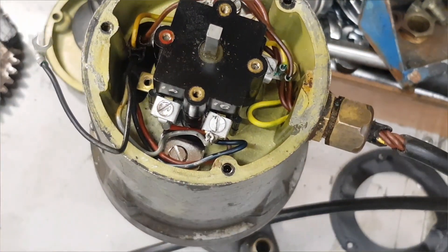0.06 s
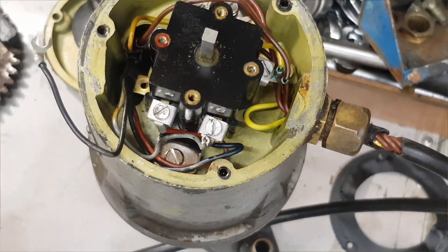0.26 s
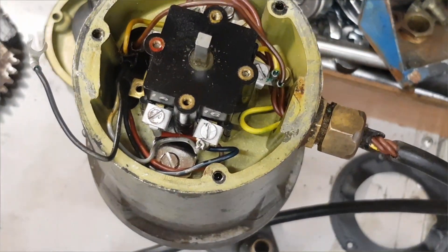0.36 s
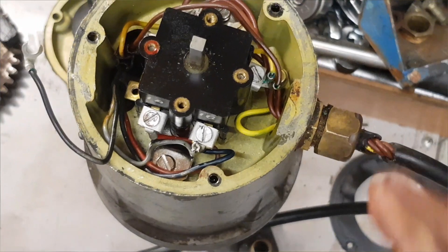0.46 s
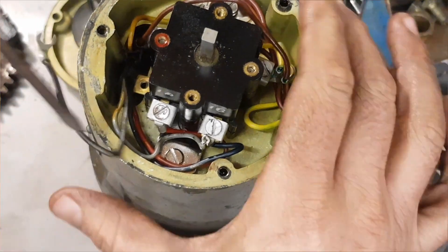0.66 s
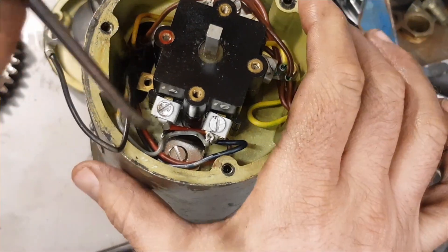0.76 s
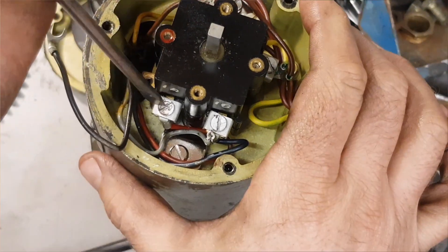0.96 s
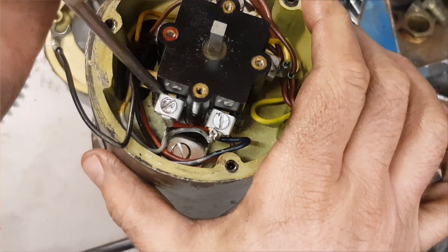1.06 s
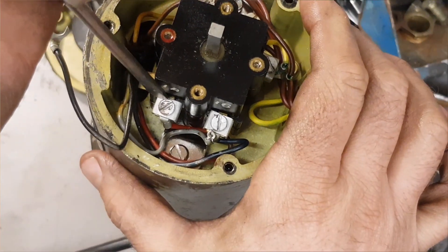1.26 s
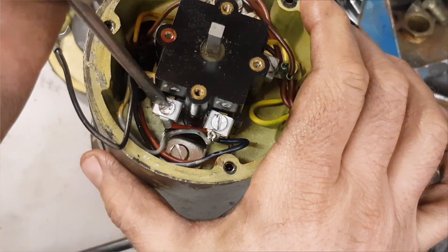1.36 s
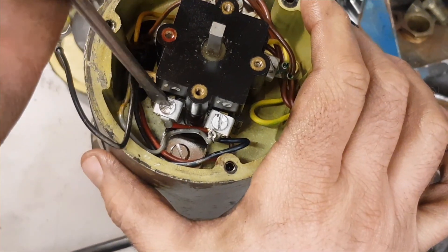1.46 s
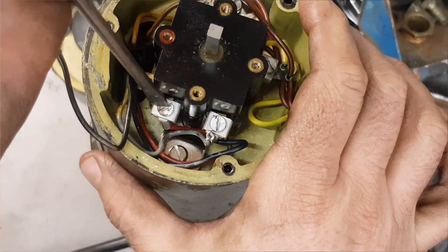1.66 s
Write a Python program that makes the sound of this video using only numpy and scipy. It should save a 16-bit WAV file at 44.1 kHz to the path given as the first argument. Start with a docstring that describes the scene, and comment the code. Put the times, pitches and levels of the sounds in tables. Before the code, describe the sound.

A steel tool clatters in a quick burst on a workbench, cloth rustles faintly, then a screwdriver clicks and briefly scrapes on motor terminal screws; close stereo microphone in a small, quiet workshop.

```python
"""In a small workshop, a steel tool clatters on a bench: noisy crashes, damped ringing modes and clunks.
Cloth swishes as coloured noise while an arm reaches over an open electric motor.
A screwdriver then taps as filtered impulses with short rings, scrapes as many tiny slips, and ticks,
its treble mostly left of the microphone. Pushes thump the bench as swelling low sines.
The room answers with a short noise tail; low rumble and thin hiss lie behind."""
import sys
import numpy as np
from scipy import signal
from scipy.fft import rfft, irfft, next_fast_len
from scipy.io import wavfile
from scipy.ndimage import uniform_filter1d

SR = 44100
rng = np.random.default_rng(int(sys.argv[2]) if len(sys.argv) > 2 else 0)


def digitize_waveform(pressure):
    """Quantize a signal to 16-bit integers and store it at the path in sys.argv[1].

    Rows of a 2-D input are taken as channels; values are limited to [-1, 1].
    """
    field = np.atleast_2d(pressure).T
    bounded = np.clip(field, -1, 1)
    quanta = np.round(bounded * 32767).astype(np.int16)
    wavfile.write(sys.argv[1], SR, quanta)


N = 74970

# how unlike the two ears are: [f/Hz, angle/rad]
EAR_DIFFERENCE = [(150, .03), (400, 0.075), (1000, 0.42), (3000, 0.56)]


def amp(db):
    """Decibels to gain."""
    return 10 ** (np.asarray(db) / 20)


def unit(x):
    """x at rms 1."""
    return x / np.sqrt(np.mean(x ** 2) + 1e-20)


def along(points, hz):
    """[f/Hz, value] points read on a log frequency axis."""
    f, value = np.transpose(points)
    return np.interp(np.log(hz + 1), np.log(f + 1), value)


def clock():
    """Time in seconds at each sample."""
    return np.arange(N) / SR


def fade(t, t60):
    """Exponential decay by 60 dB in t60 seconds."""
    return np.exp(-np.log(1000) * t / t60)


def stroke(start, peak, end):
    """Pressure rising to a peak and letting go; times in seconds."""
    return np.interp(clock(), [start, peak, end], [0, 1, 0]) ** 1.24


def colour(x, curve):
    """Causal minimum-phase filter whose gain in dB is curve(Hz)."""
    m = 2 * next_fast_len(N)
    log_gain = curve(np.fft.rfftfreq(m, 1 / SR)) * np.log(10) / 20
    # folding the cepstrum forward in time makes the filter causal
    cepstrum = irfft(log_gain, m)
    cepstrum[1:m // 2] *= 2
    cepstrum[m // 2 + 1:] = 0
    response = np.exp(rfft(cepstrum))
    return irfft(rfft(x, m) * response, m)[..., :N]


def shaped(x, points):
    """x coloured by [f/Hz, gain/dB] points."""
    return colour(x, lambda hz: along(points, hz))


def tilted(x, tilt_db):
    """x tilted by tilt_db per octave about 2500 Hz, level beyond 700 and 12000 Hz."""
    return colour(x, lambda hz: tilt_db * np.log2(np.clip(hz, 700, 12000) / 2500))


def noise(points):
    """Coloured stereo noise of rms 1, most alike in both ears in the bass."""
    def side_curve(hz):
        angle = np.clip(along(EAR_DIFFERENCE, hz), .01, .78)
        return along(points, hz) + 20 * np.log10(np.tan(angle))

    mid = shaped(rng.standard_normal(N), points)
    side = colour(rng.standard_normal(N), side_curve)
    return unit(np.array([mid + side, mid - side]))


def placed(x, pan):
    """Stereo placing by [f/Hz, left over right/dB] points."""
    left, right = np.broadcast_to(x, (2, N))
    return np.array([colour(left, lambda hz: along(pan, hz) / 2),
                     colour(right, lambda hz: -along(pan, hz) / 2)])


def ring(modes, scatter_db=1.1, in_step=False):
    """Damped modes [f/Hz, level/dB, t60/s], in step or at random phases, shifted in the right ear."""
    t = clock()[:SR // 2]
    out = np.zeros((2, N))
    for hz, db, t60 in modes:
        lag = along(EAR_DIFFERENCE, hz) * rng.choice([-1, 1]) * np.array([[0], [2]])
        start_turn = rng.random() * (not in_step)
        tone = np.sin(2 * np.pi * (hz * t + start_turn) + lag)
        onset = 1 - np.exp(-(2 * hz * t) ** 2)
        level = amp(db + scatter_db * rng.standard_normal())
        out[:, :len(t)] += level * fade(t, t60) * onset * tone
    return out


def add(track, s, sound):
    """Mix a sound in from time s."""
    i = max(0, round(s * SR))
    track[..., i:] += sound[..., :N - i]


def room(x):
    """The workshop's short diffuse answer: stereo noise that builds up, then decays band by band."""
    # decay time of the room: [f/Hz, t60/s]
    room_t60 = [(150, .25), (1000, .16), (2000, .21), (4000, .18), (12000, .14)]
    build_s = 0.0067  # time constant
    hz, t, bands = signal.stft(rng.standard_normal((2, SR // 2)), SR, nperseg=256)
    decay = fade(t, along(room_t60, hz)[:, None])
    build = 1 - np.exp(-t / build_s)
    tail = signal.istft(bands * decay * build, SR, nperseg=256)[1]
    return signal.fftconvolve(x, tail / np.linalg.norm(tail[0]), axes=1)[:, :N]


def tool_clatter():
    """Steel on the bench: a fading slide, and contacts that each crash, ring their modes and clunk."""
    # contacts: [t/s, level/dB, tilt/dB per octave, rise time constant/s, clunk level/dB]
    contacts = [(0.103, -37, -1, 0.0015, 6), (0.108, -31, -1, 0.0015, -10), (0.122, -41, -3, 0.0011, -4),
                (0.1438, -17.5, 0, 0.0002, 2), (0.1518, -22, 0, 0.0005, -4),
                (0.161, -24.5, 0.5, 0.0006, -14), (0.169, -24.5, 1.5, 0.0005, -12),
                (0.176, -31, 0, 0.0009, -8), (0.2072, -35, -1, 0.0003, 3), (0.2145, -42, -2, 0.0005, 1),
                (0.2225, -42, -2, 0.001, 2), (0.357, -62, -1.5, 0.0016, -20)]
    # modes of the tool on the bench: [f/Hz, level/dB, t60/s]
    tool_modes = [(240, -4, .1), (375, -16, .12), (420, -19, .11), (715, -12, .08), (868, -6, .07),
                  (1007, -4, .06), (1190, -5, .06), (1750, -9, .06), (2330, -11, .05), (2820, -10, .05),
                  (4140, -10, .045), (4700, -10, .045)]
    # dense, quickly dying part of the ring: [f/Hz, level/dB]
    crash_colour = [(100, -17.5), (550, -21.5), (850, -2.5), (1150, -0.5), (1400, -2.5), (2000, -9),
                    (2400, -8.5), (4900, -4.5), (6800, -19), (11000, -19), (16000, -27)]
    # hollow clunk of a square hit: [f/Hz, level/dB, t60/s]
    clunk_modes = [(910, -6, 0.04), (1050, 0, 0.025), (4900, -10, 0.018)]
    # place of the tool: [f/Hz, left over right/dB]
    tool_pan = [(200, -1.5), (800, 6), (2400, 5), (4400, 9), (8000, 1)]
    # slide of the tool: [start t/s, peak t/s, end t/s, level/dB]; only its fade to the end is heard
    drag = (-0.37, -0.5, 0.54, -62.5)
    crash_db, crash_t60, grain_db = -2, 0.063, 3.5  # grain: rms unevenness of the chatter in dB
    ring_db, room_db = -4.5, -16.5

    t = clock()
    start, peak, end, drag_db = drag
    drag_swell = np.interp(t, [start, peak, end], [0, 1, 0]) ** 2
    out = amp(drag_db) * noise(crash_colour) * drag_swell
    for s, db, tilt_db, rise_s, clunk_db in contacts:
        unevenness = unit(uniform_filter1d(rng.standard_normal(N), size=40))
        chatter = unit(amp(grain_db * unevenness))
        crash = amp(crash_db) * noise(crash_colour) * chatter * fade(t, crash_t60)
        modes = amp(ring_db) * ring(tool_modes)
        clunk = amp(clunk_db) * ring(clunk_modes, in_step=True)
        rise = 1 - np.exp(-t / rise_s)
        add(out, s, amp(db) * (tilted(crash + modes, tilt_db) + clunk) * rise)
    return placed(out + amp(room_db) * room(out), tool_pan)


def blade_contact(ring_db, edge_hz):
    """One touch of steel on the terminal: a snap, its scatter in the open housing and a short ring."""
    # colour of the snap: [f/Hz, gain/dB]
    snap_colour = [(300, -22.5), (900, -17), (1600, 5.5), (2800, -1), (3700, -10), (5000, -3.5),
                   (7000, -13), (9000, -24.5), (16000, -38)]
    # modes of blade and terminal: [f/Hz, level/dB, t60/s]
    blade_modes = [(1570, -11, .025), (1770, -9, .022), (2130, -9, .024), (2480, -12, .018),
                   (2730, -10, .018), (3270, -7, .014), (3500, -3, .018), (3690, 1, .02), (4090, -4, .016),
                   (4500, -10, .014), (5270, -13, .022), (6420, -22, .02)]
    snap_db, housing_db, housing_t60, base_ring_db = 18, -13.5, 0.05, -8
    snap = amp(snap_db) * shaped(signal.unit_impulse(N), snap_colour)
    scatter = amp(housing_db) * noise(snap_colour) * fade(clock(), housing_t60)
    blade_ring = amp(base_ring_db + ring_db) * ring(blade_modes, in_step=True)
    # the treble falls off above the edge frequency of the contact
    return colour(snap + scatter + blade_ring, lambda hz: -10 * np.log10(1 + (hz / edge_hz) ** 4))


def scrape(low_hz, high_hz, high_db):
    """Tiny uneven slips excite two squeaking resonances over some grit."""
    # grit between the squeaks: [f/Hz, gain/dB]
    grit_colour = [(700, -9.5), (1700, -1.5), (5500, -2.5), (8000, -12), (13000, -31)]
    slips_per_s, squeak_t60, grit_db = 3000, 0.017, -2
    slips = (rng.random(N) < slips_per_s / SR) * rng.choice([-1, 1], N)
    modes = ring([(low_hz, 0, squeak_t60), (high_hz, high_db, squeak_t60)], in_step=True)
    squeak = signal.fftconvolve(slips[None], modes, axes=1)[:, :N]
    grit = amp(grit_db) * unit(shaped(slips, grit_colour))
    return unit(unit(squeak) + grit)


def screwdriver():
    """The blade taps the screws and slips over their heads; the shaft ticks lightly on the housing."""
    # blade taps: [t/s, level/dB, tilt/dB per octave, ring level/dB, treble edge f/Hz]
    taps = [(1.0285, -29.5, 4.5, -6, 8000), (1.0764, -41, -3.5, 4, 3440), (1.1134, -18, 3.5, 3, 5100),
            (1.1187, -28, 4.5, 7.5, 4800), (1.292, -50, 2.5, -10, 4950), (1.455, -36, 2.5, -2.5, 10000)]
    # slips: [start t/s, peak t/s, end t/s, level/dB, lower squeak f/Hz, upper squeak f/Hz, upper level/dB]
    scrapes = [(1.075, 1.088, 1.098, -45.5, 2130, 3640, 2), (1.092, 1.101, 1.109, -52, 1900, 4300, -8),
               (1.302, 1.336, 1.345, -52, 2540, 3750, 2)]
    # shaft ticks: [t/s, level/dB]
    ticks = [(0.7505, -46.5), (0.884, -63)]
    # modes of a tick: [f/Hz, level/dB, t60/s]
    tick_modes = [(1850, -5.5, 0.034), (3556, -5.5, 0.03), (5073, -6, 0.019), (6470, 2.5, 0.0083),
                  (7690, -7, 0.014), (11630, -3, 0.0067)]
    # snap of a tick: [f/Hz, level/dB]
    tick_colour = [(500, -39), (1700, 17), (6500, -15), (9000, -13), (12000, -4), (15000, -10)]
    # place of the blade: [f/Hz, left over right/dB]
    blade_pan = [(200, -11.5), (1000, 5), (4400, 16.5), (8000, 3), (14000, 20)]
    # what the blade radiates into the room: [f/Hz, gain/dB]
    blade_to_room = [(500, 14), (1200, -3), (2500, -1), (3700, -6), (4800, 1.5), (6500, 5), (12000, 12)]
    tick_snap_db, tick_snap_t60, tick_ring_db, room_db = -6, 0.009, -1.5, -12

    t = clock()
    out = np.zeros((2, N))
    for s, db, tilt_db, ring_db, edge_hz in taps:
        add(out, s, amp(db) * tilted(blade_contact(ring_db, edge_hz), tilt_db))
    for start, peak, end, db, low_hz, high_hz, high_db in scrapes:
        out += amp(db) * scrape(low_hz, high_hz, high_db) * stroke(start, peak, end)
    for s, db in ticks:
        snap = amp(tick_snap_db) * noise(tick_colour) * fade(t, tick_snap_t60)
        add(out, s, amp(db) * (snap + amp(tick_ring_db) * ring(tick_modes)))
    answer = placed(room(shaped(out, blade_to_room)), [(300, 2), (3000, 3.6)])
    return placed(out, blade_pan) + amp(room_db) * answer


def bench():
    """Pushes give thuds of a few cycles and a faint bench ring; the motor casing mutters and rings."""
    # pushes that thump the bench: [t/s, level/dB, swell time/s, f/Hz]
    thumps = [(0.058, -24.5, 0.015, 133), (0.107, -27, 0.011, 192), (0.1429, -18.5, 0.012, 138),
              (0.168, -24, 0.0093, 136.5), (0.21, -33, 0.0073, 190), (0.23, -35, 0.0076, 146),
              (1.03, -35, 0.014, 144.4), (1.116, -37, 0.0088, 138), (1.146, -36, 0.016, 148),
              (1.171, -37.5, 0.009, 147), (1.455, -32.5, 0.014, 145.5), (1.505, -44.5, 0.016, 84.9)]
    # modes of the bench top: [f/Hz, level/dB, t60/s]
    bench_modes = [(59, -19.5, 0.2), (118, -24, 0.14), (232, -19.5, 0.08)]
    # motor casing under the blade's pressure: [t/s, level/dB]
    knocks = [(1.030, -46.5), (1.114, -43.5), (1.144, -42.5), (1.172, -52.5), (1.456, -50.5)]
    # colour of the casing's mutter: [f/Hz, level/dB]
    casing_colour = [(80, 5), (220, -4.5), (420, -16), (600, -18.5), (900, -15.5), (2500, -31), (8000, -71)]
    # ring of the casing: [f/Hz, level/dB, t60/s]
    casing_modes = [(903, -4, 0.065)]
    casing_t60, room_db = 0.14, -13

    t = clock()
    out = np.zeros((2, N))
    for s, db, swell_s, hz in thumps:
        u = t / swell_s
        thud = u * np.exp(-u ** 2) * np.sin(2 * np.pi * hz * t)
        top_ring = ring(bench_modes) * (1 - np.exp(-u ** 2))
        add(out, s, amp(db) * (thud + top_ring))
    for s, db in knocks:
        mutter = noise(casing_colour) * fade(t, casing_t60) * (1 - np.exp(-t / 0.0015))
        add(out, s, amp(db) * (mutter + ring(casing_modes, in_step=True)))
    answer = room(out)[0]  # the same in both ears
    return placed(out + amp(room_db) * answer, [(200, 1.1), (900, 9.3)])


def clothing():
    """Coloured noise swishes as the arm reaches over, with a brief wavering tone of rubbing."""
    # swell of the swish: [t/s, level/dB]
    swish = [(0, -73), (0.3, -76.5), (0.421, -64), (0.499, -60.5), (0.6, -59), (0.68, -65), (0.763, -69),
             (0.861, -79)]
    # colour of the cloth: [f/Hz, level/dB]
    cloth_colour = [(200, -1.5), (440, 4.5), (600, -5.5), (1300, -4.5), (1900, -0.5), (2900, -9), (4400, 1),
                    (6500, -4), (9000, -5.5), (11300, -3), (15500, -9)]
    # place of the cloth: [f/Hz, left over right/dB]
    cloth_pan = [(400, 10), (2000, 6), (4400, 10.5), (9000, 7.5)]
    # faint rubbing tone: [start t/s, peak t/s, end t/s, f/Hz]
    rub_stroke = (0.45, 0.51, 0.56, 447)
    rub_db, waver_share = -64.5, 0.01  # waver: rms share of the pitch

    start, peak, end, hz = rub_stroke
    waver = unit(uniform_filter1d(rng.standard_normal(N), size=500))
    pitch = hz * (1 + waver_share * waver)
    tone = np.sin(2 * np.pi * np.cumsum(pitch) / SR)
    rub = amp(rub_db) * stroke(start, peak, end) * tone
    level = amp(np.interp(clock(), *np.transpose(swish)))
    return placed(level * noise(cloth_colour) + rub, cloth_pan)


def grip():
    """A dull noise rumble as the hand takes hold of the motor casing."""
    # swell of the hand's rumble: [t/s, level/dB]
    grip_level = [(0.54, -85), (0.599, -57.5), (0.661, -60.5), (0.73, -57.5), (0.8, -63.5), (0.9, -77)]
    # colour of the rumble: [f/Hz, level/dB]
    grip_colour = [(20, -18), (50, 6.5), (85, -6), (150, -3.5), (220, -26.5), (400, -27.5), (1500, -54.5)]
    return amp(np.interp(clock(), *np.transpose(grip_level))) * noise(grip_colour)


def background():
    """Low workshop rumble under a thin hiss, both steady coloured noise."""
    # low rumble: [f/Hz, level/dB]
    rumble_colour = [(20, -8), (50, 2.5), (85, 3.5), (140, 0), (210, -18), (400, -23), (1000, -37.5),
                     (4000, -67)]
    # thin hiss: [f/Hz, level/dB]
    hiss_colour = [(100, 8.5), (500, 4.5), (1000, 1.5), (3000, -1), (8000, -4.5), (15000, -1.5)]
    rumble_db, hiss_db = -64.5, -70
    rumble = amp(rumble_db) * noise(rumble_colour)
    hiss = amp(hiss_db) * noise(hiss_colour)
    return placed(rumble + hiss, [(60, 1.7), (400, 1.1), (8000, 1.2)])


def scene():
    """Everything heard at the bench."""
    return tool_clatter() + screwdriver() + bench() + clothing() + grip() + background()


def record(dry):
    """The recorder thins the deepest bass and cuts steeply above its band limit."""
    low_cut_hz, top_hz = 35, 15900
    m = 2 * next_fast_len(N)
    high_pass = signal.butter(2, low_cut_hz, 'high', fs=SR, output='sos')
    thinned = signal.sosfilt(high_pass, dry)
    hz = np.fft.rfftfreq(m, 1 / SR)
    band_limit = 1 / np.sqrt(1 + (hz / top_hz) ** 200)
    return irfft(rfft(thinned, m) * band_limit, m)[:, :N]


dry = scene()
out = record(dry)
digitize_waveform(out)
```